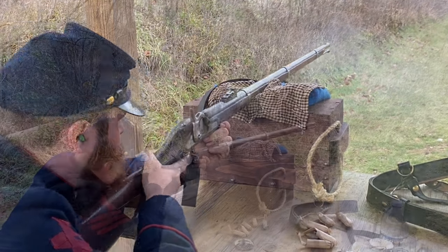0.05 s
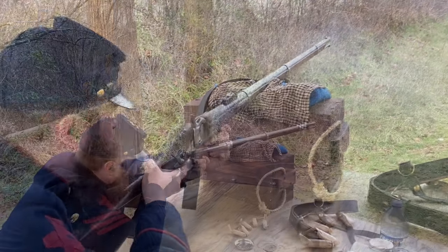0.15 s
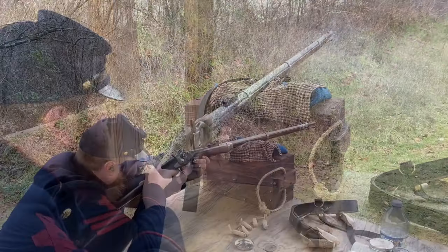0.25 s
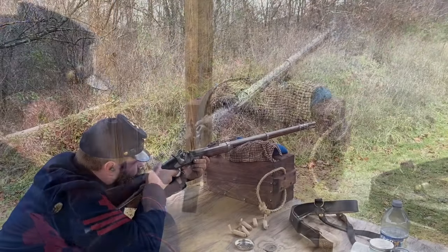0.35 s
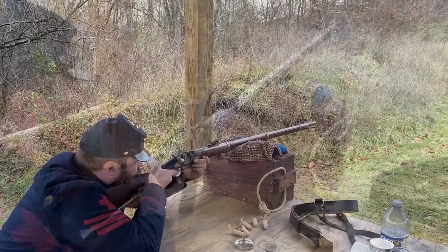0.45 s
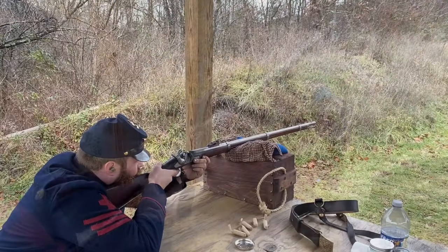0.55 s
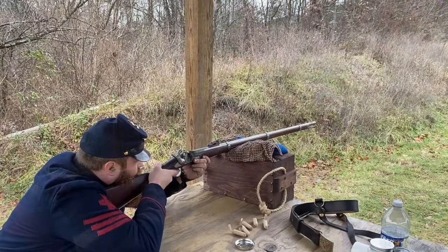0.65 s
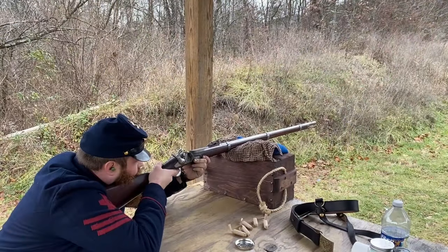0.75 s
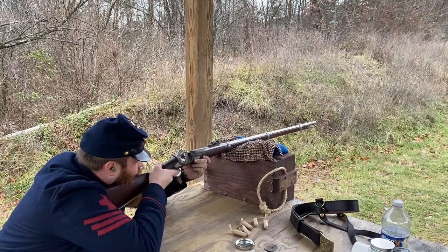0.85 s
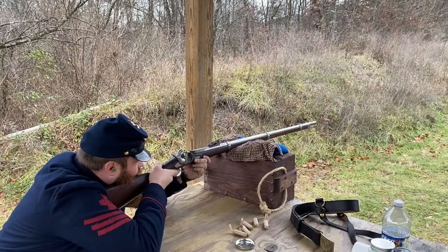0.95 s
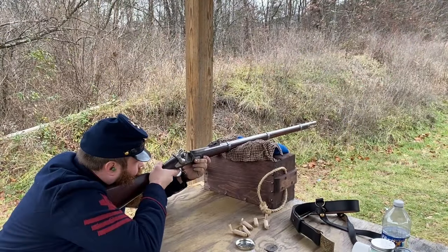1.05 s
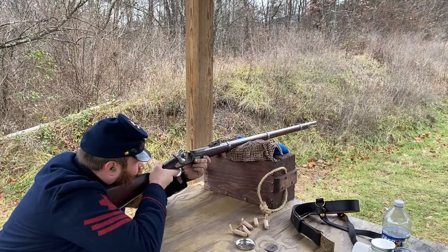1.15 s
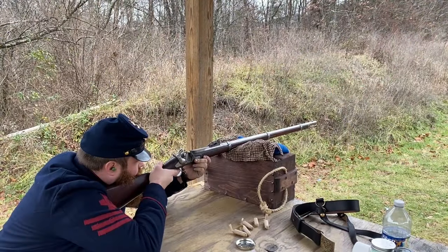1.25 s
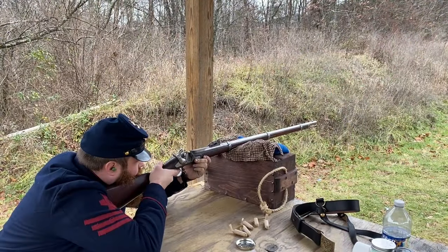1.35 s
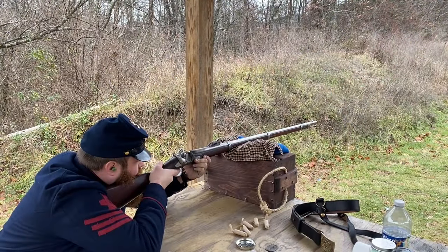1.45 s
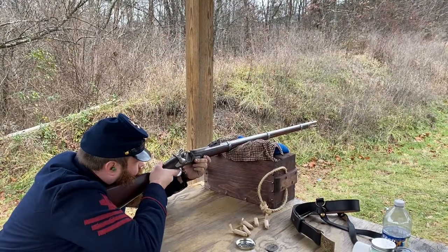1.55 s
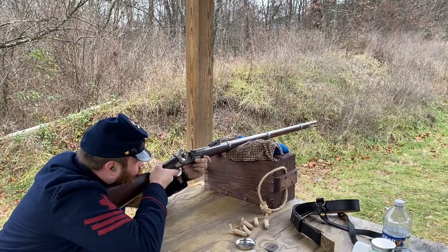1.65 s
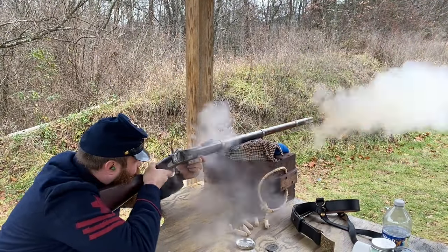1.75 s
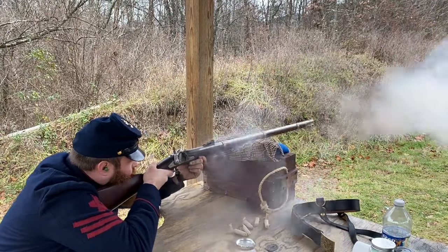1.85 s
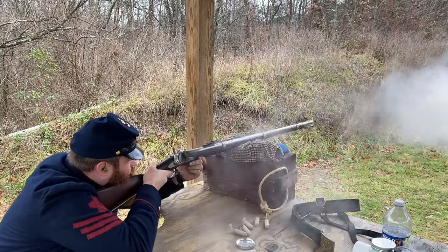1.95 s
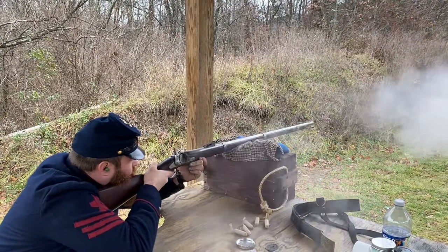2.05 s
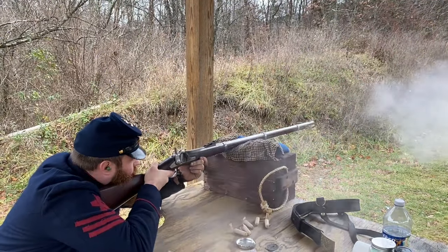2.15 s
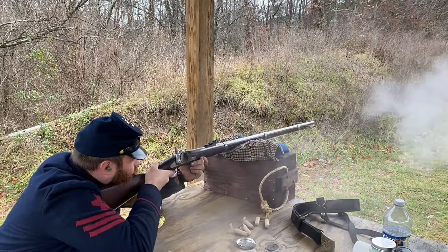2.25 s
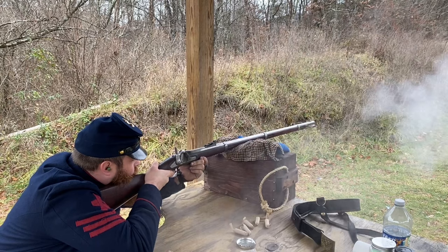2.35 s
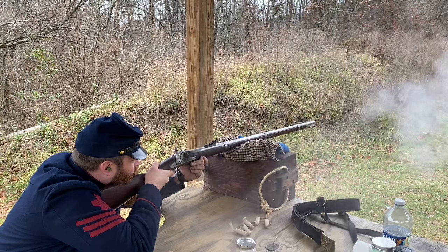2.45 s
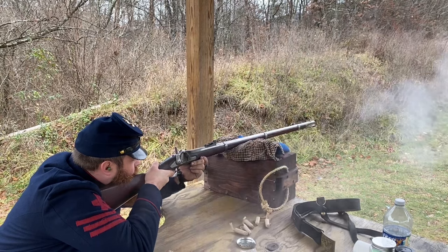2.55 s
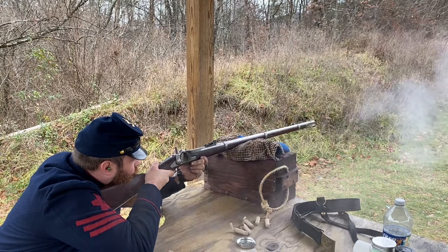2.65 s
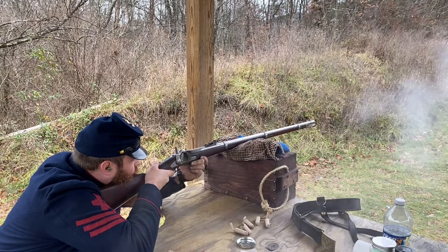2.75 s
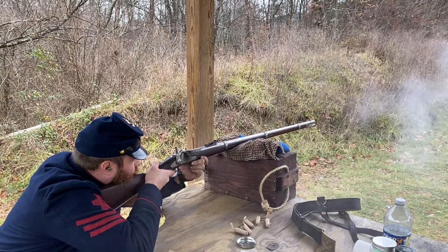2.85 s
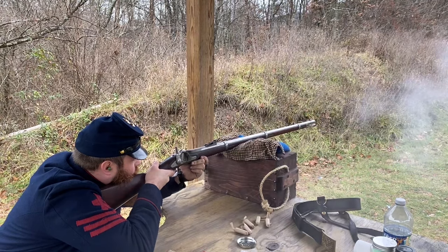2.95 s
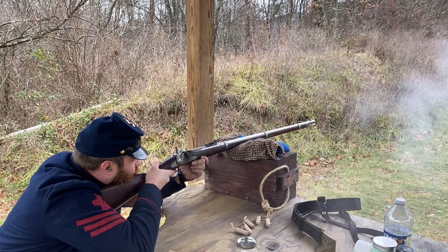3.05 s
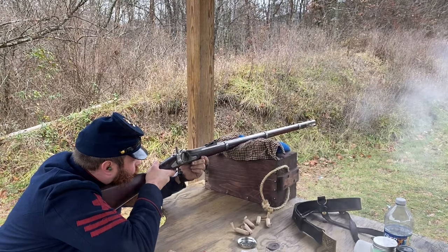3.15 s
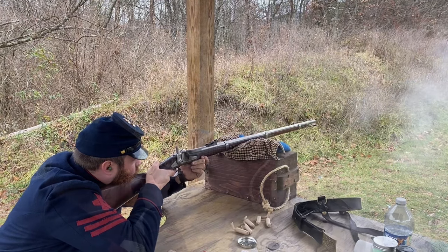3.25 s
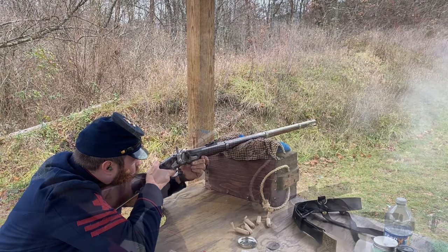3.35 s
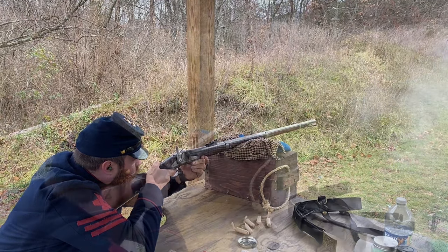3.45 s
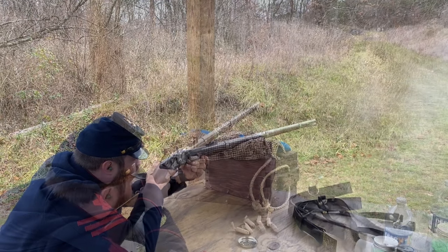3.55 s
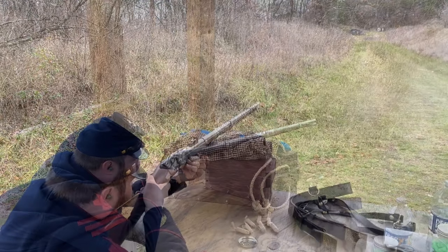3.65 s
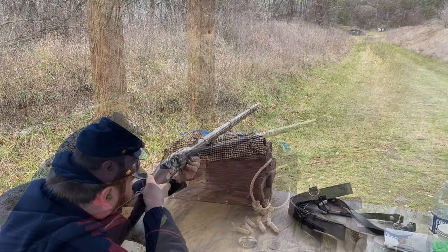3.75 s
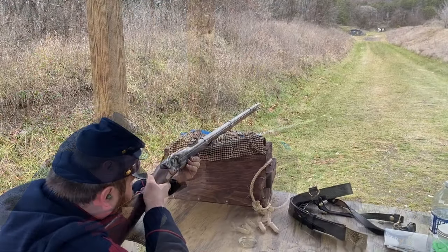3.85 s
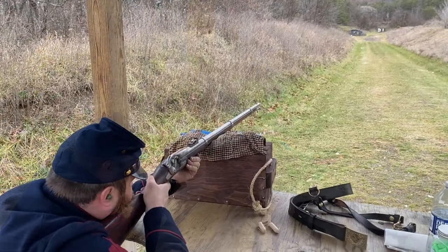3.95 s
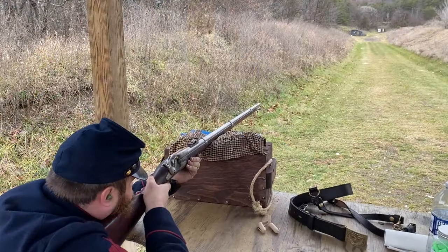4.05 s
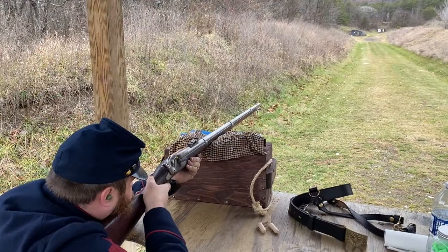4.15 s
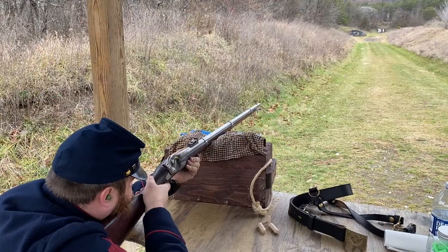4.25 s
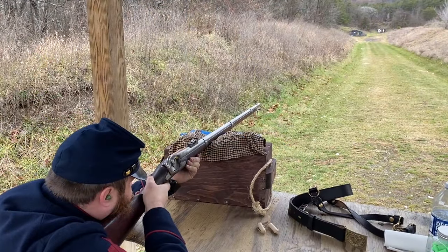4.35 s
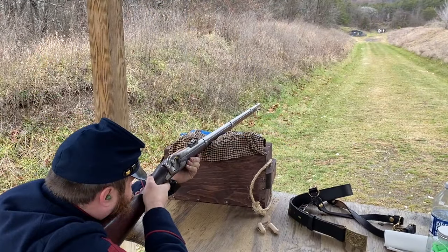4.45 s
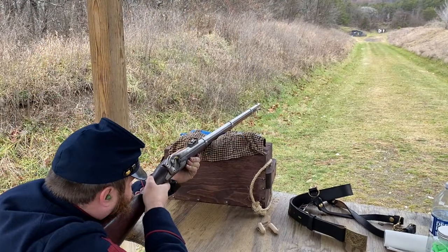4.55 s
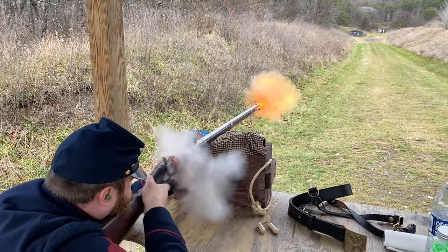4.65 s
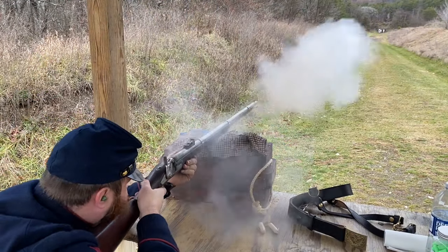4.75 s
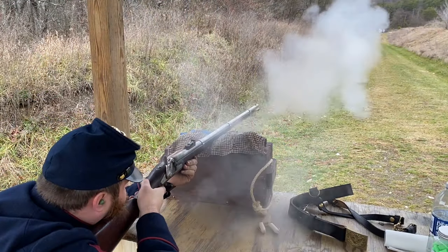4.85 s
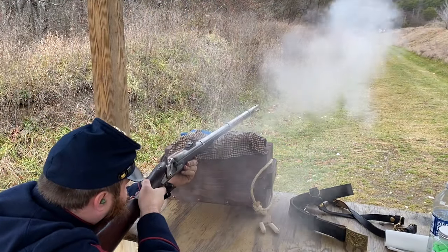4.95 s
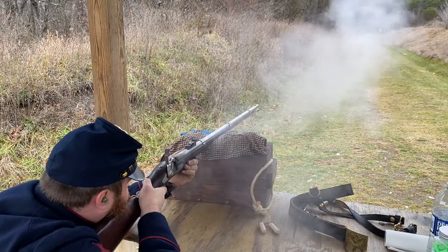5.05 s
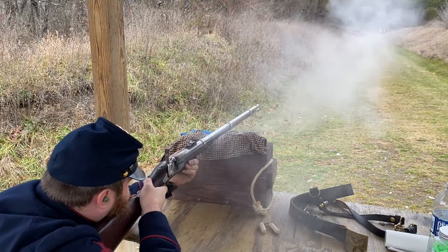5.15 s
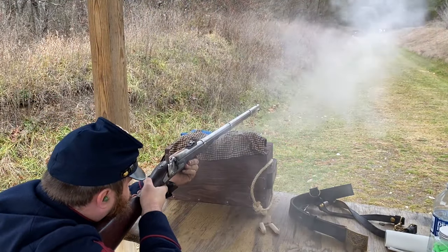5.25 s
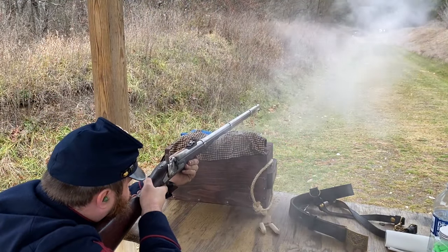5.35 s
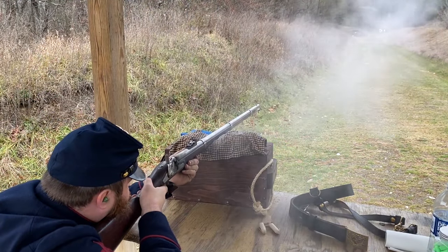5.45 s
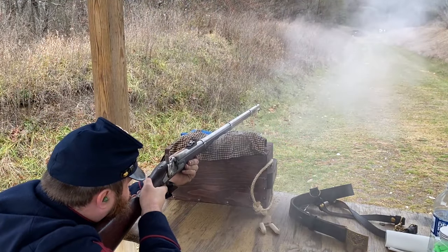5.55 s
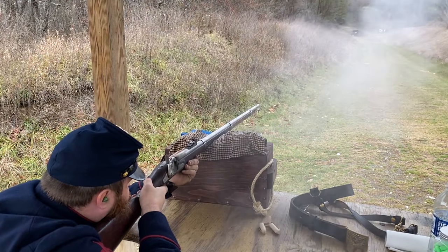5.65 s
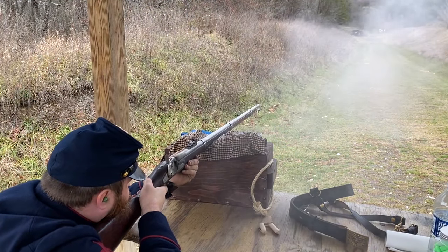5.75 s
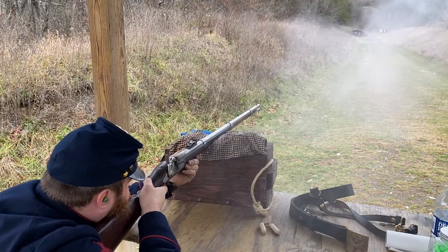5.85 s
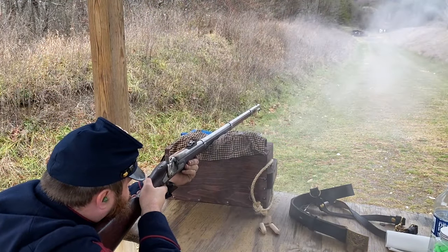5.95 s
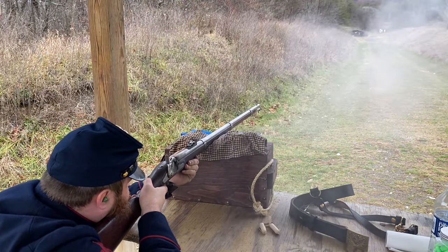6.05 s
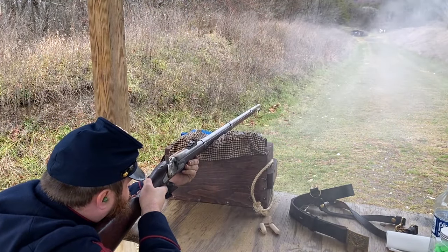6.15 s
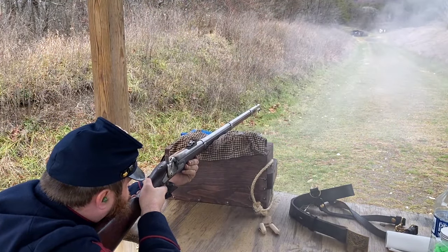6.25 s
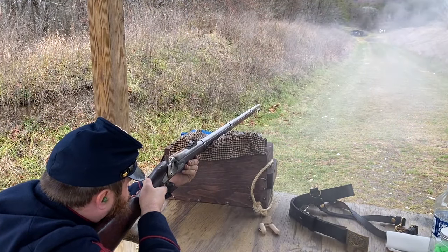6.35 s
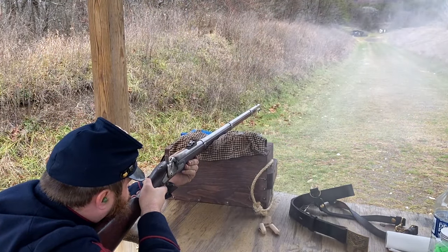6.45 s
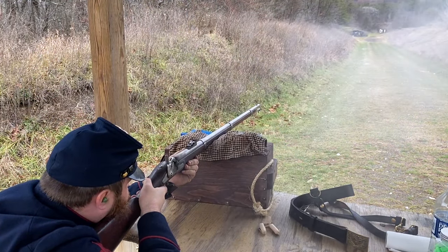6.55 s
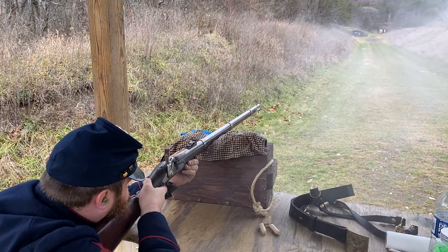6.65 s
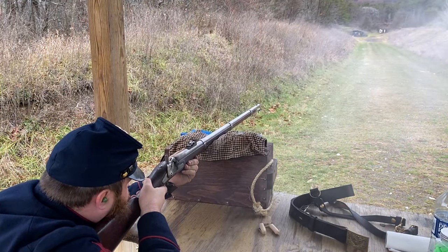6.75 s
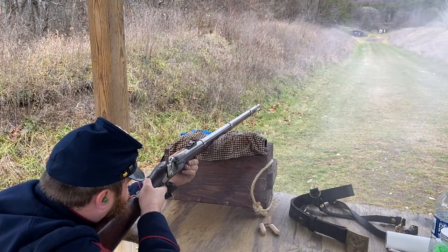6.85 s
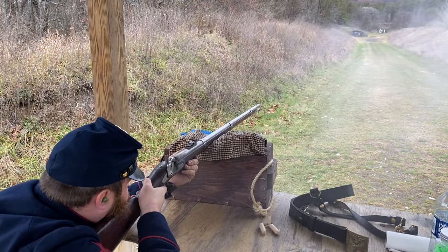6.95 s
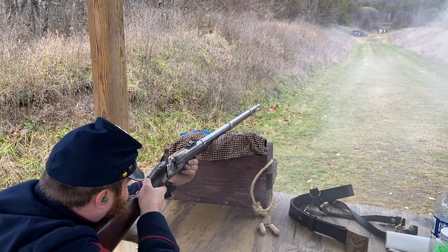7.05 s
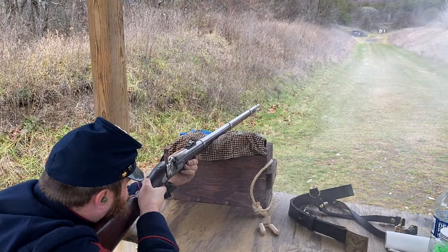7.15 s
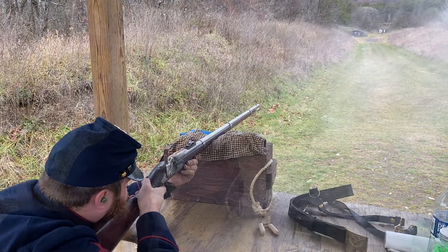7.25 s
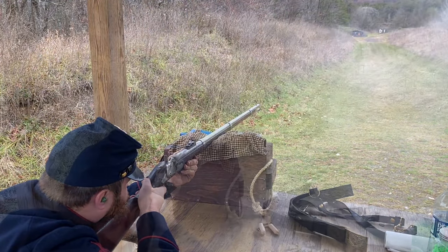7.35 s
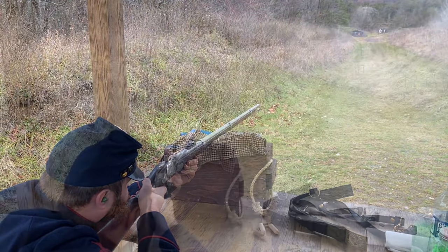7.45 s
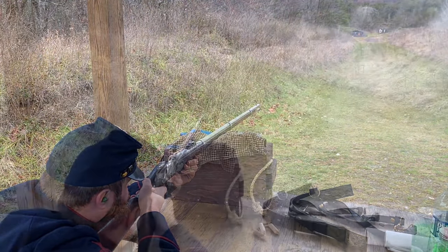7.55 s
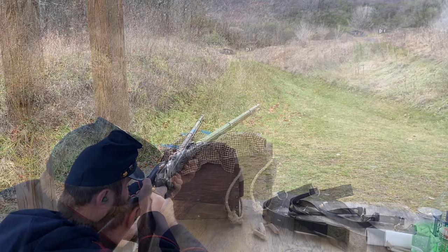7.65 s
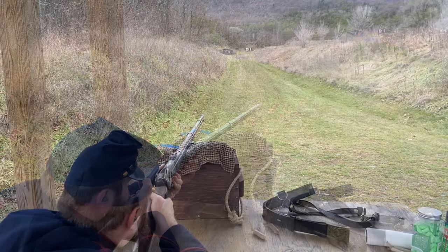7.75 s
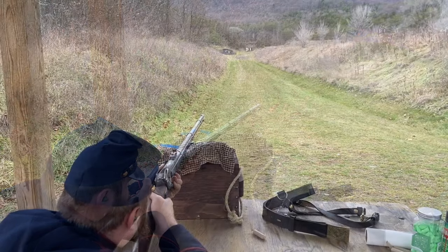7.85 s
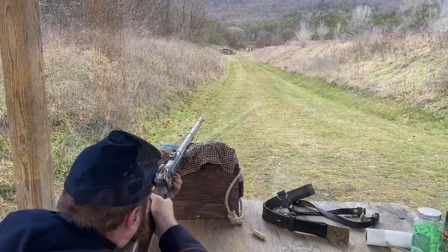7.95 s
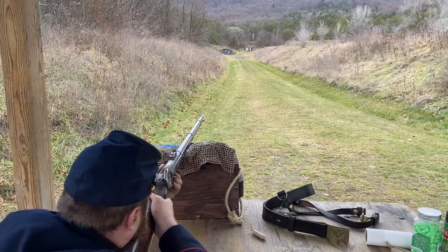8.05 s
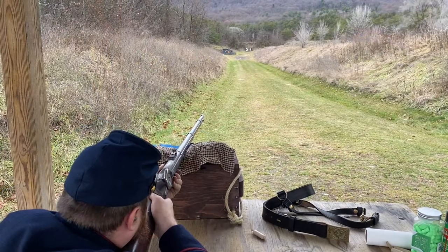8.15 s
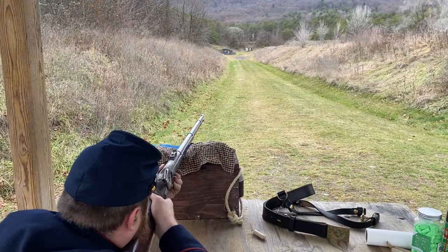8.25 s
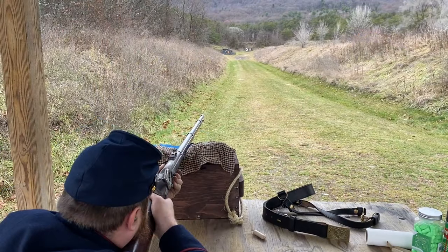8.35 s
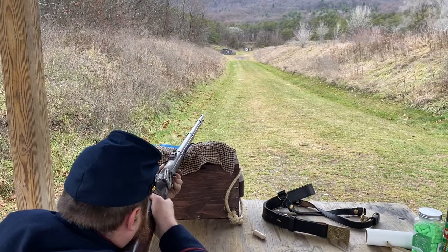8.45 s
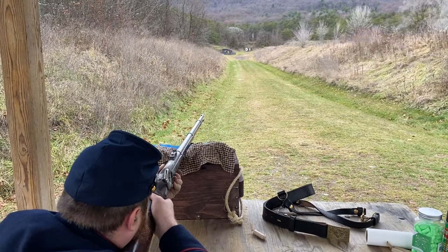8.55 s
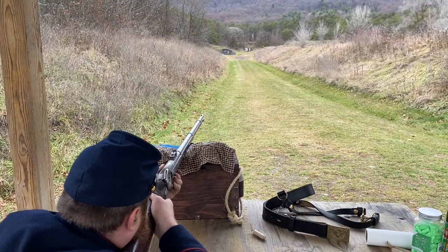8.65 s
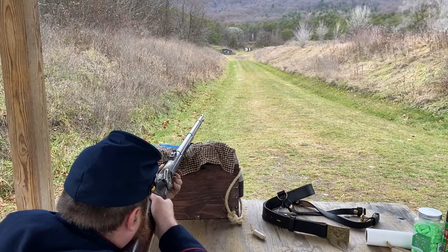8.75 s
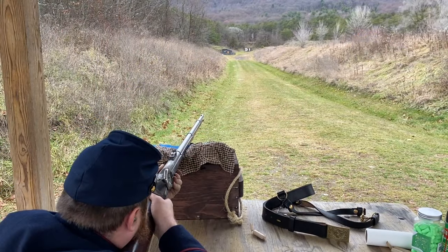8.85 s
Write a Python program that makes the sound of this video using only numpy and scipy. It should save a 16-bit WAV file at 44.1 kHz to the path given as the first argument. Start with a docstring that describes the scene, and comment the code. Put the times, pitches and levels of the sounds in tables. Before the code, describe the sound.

Two loud black-powder rifle shots outdoors, each a cap hiss and overloaded boom with rolling echoes, amid other gunfire, small cracks and low rumble.

```python
"""A black-powder rifle is fired twice from a wooden shelter at the end of a grassy lane between wooded banks.
Cap hiss and blast are shaped noise plus pressure pulses; they overload the microphone, and echoes roll back.
A neighbouring gun fires once; cracks, thumps and knocks are short noise and dying modes, faint tones are sines.
Behind lie a far roar and a low rumble with an engine drone, which drops at each blast and sinks on."""
import sys
import numpy as np
from scipy import signal
from scipy.fft import rfft, irfft, next_fast_len
from scipy.io import wavfile
from scipy.ndimage import uniform_filter1d

SR = 44100
rng = np.random.default_rng(int(sys.argv[2]) if len(sys.argv) > 2 else 0)


def store_pcm(level_fs):
    """Save levels as 16-bit WAV."""
    pcm = np.round(np.clip(level_fs, -1, 1) * 32767).astype(np.int16)
    wavfile.write(sys.argv[1], SR, np.atleast_2d(pcm).T)


N = 392049

# the two rifle shots: [cap t/s, rise of the cap hiss/s, cap level/dB, blast t/s, blast level/dB,
# bass left over right/dB]
SHOTS = [(1.813, .008, -6.5, 1.828, -11.5, 4), (4.744, 0.01, -9, 4.768, -10.5, 1.5)]


def shot(cap_s, rise_s, cap_db, blast_s, blast_db, bass_left_db):
    """The cap spits and hisses at the breech; then the muzzle blast bounces between roof, posts and bench."""
    # colour of the cap hiss: [f/Hz, relative level/dB]
    cap_colour = [(35, -29.5), (60, -6), (527, -3.5), (4220, -15), (4640, -22.5), (6430, -15.5),
                  (7400, -22.5), (8120, -16), (8710, -47), (16000, -43)]
    # colour of the muzzle blast: [f/Hz, relative level/dB]
    blast_colour = [(30, -7.5), (70, -1.5), (140, -2.5), (260, -1), (520, -4), (900, -4.5), (1500, -7),
                    (4000, -17.5), (7000, -23), (11000, -23), (16000, -30.5)]
    # decay under the roof: [f/Hz, time to fall 60 dB/s]
    shelter_decay = [(40, 0.23), (120, 0.32), (300, .22), (1000, 0.15), (4000, 0.17), (8000, .16),
                     (14000, .15)]
    # ring of lock, barrel and bench: [f/Hz, width/Hz, height/dB]
    lock_modes = [(258, 72, 3), (545, 68, 6.5), (1137, 40, 5.5), (1910, 100, 5), (4460, 180, 6.5),
                  (5360, 440, 7), (6030, 120, 8), (6550, 57, 8.5), (7700, 170, 7)]

    def cap_shape(hz, t):
        return read(cap_colour, hz) + bumps(lock_modes, hz)

    def blast_shape(hz, t):
        decay_db = 60 * np.maximum(t - .02, 0) / read(shelter_decay, hz)
        return read(blast_colour, hz) + .5 * bumps(lock_modes, hz) - decay_db

    t = np.arange(round(.35 * SR)) / SR
    after_blast = np.maximum(t - (blast_s - cap_s), 0)
    hiss = np.minimum(t / rise_s, 1) ** 1.6 * np.exp(-after_blast / .005)
    cap = field(.35, cap_shape, alike=0.43, bass_left_db=bass_left_db, size=512)
    boom = field(.35, blast_shape, alike=0.99, bass_left_db=bass_left_db,
                 patchy_db=2, flicker_db=2, size=512)
    # shock front: a push and a rebound
    quick = t / 0.00071
    front = 2.5 * (1 - quick) * np.exp(-quick)
    # powder gas shoves the air aside, stronger on the left
    slow = t / 0.0082
    heave = .6 * slow * (1 - slow / 3) * np.exp(-slow) * gain_of([[6], [-6]])
    blast = boom * np.minimum(t / 0.0015, 1) + front + heave
    out = np.zeros((2, N))
    add(out, cap_s, gain_of(cap_db) * cap * hiss)
    add(out, blast_s, gain_of(blast_db) * blast)
    return out


def echoes(blast_s):
    """Nearby trees answer brightly; the bank slaps back; later echoes lose treble to the air."""
    # near trees, then the far bank, then the valley: [t after the blast/s, level/dB]
    roll_level = [(.035, -41.5), (.13, -43.5), (.222, -44), (.235, -38), (.272, -35.5), (.36, -38.5),
                  (.5, -43.5), (.85, -56.5), (1.1, -62), (1.4, -66), (2.1, -82)]
    # colour of the rolling echo: [f/Hz, relative level/dB]
    roll_colour = [(30, -18.5), (100, 9.5), (300, -1), (800, 1), (1500, -4), (3000, -11.5), (6000, -22),
                   (10000, -31.5), (16000, -34)]
    bank_s, bank_db = .2318, -28  # delay and level of the slap from the far bank

    def roll_shape(hz, t):
        air_loss_db = 24 * np.clip(t - .3, 0, .55) * (hz / 5000) ** 2.0
        near_trees_db = 6 * (t < .19) * np.clip(hz / 4000, 0, 1)
        return read(roll_colour, hz) - air_loss_db + near_trees_db

    out = np.zeros((2, N))
    add(out, *played(np.add(roll_level, [blast_s, 0]), roll_shape,
                     alike=0.94, patchy_db=2, flicker_db=1, size=1024))
    add(out, blast_s + bank_s, slap(bank_db))
    add(out, blast_s + bank_s + .02, ring(-36, 150, .3, .015))  # low thud behind the slap
    return out


def slap(db):
    """One strong dull echo: a broad low-pitched burst without ringing body."""
    return burst(db, 700, 1.5, 1, .2, -8, 0, body=[])


def neighbour_gun():
    """The other gun and its echoes: one noise field that follows their levels and loses treble."""
    # the gun and its echoes: [t/s, level/dB]
    gun_level = [(1.177, -24.5), (1.215, -31.5), (1.245, -28), (1.27, -32.5), (1.45, -33), (1.63, -33),
                 (1.822, -37)]
    # colour at the start: [f/Hz, relative level/dB]
    gun_colour = [(60, -22), (110, -7), (200, -14.5), (300, -5.5), (530, -5.5), (920, 0), (1900, -10.5),
                  (3500, -19.5), (5500, -31), (9000, -56), (12000, -72.5), (16000, -100)]

    def gun_shape(hz, t):
        return read(gun_colour, hz) - 22 * t * (hz / 5000) ** 0.94

    return played(gun_level, gun_shape, alike=0.94, lead_s=.00043, patchy_db=2, size=512)


def burst(db, hz, octaves, pitch, t60, tail_db, pan_db, body=None):
    """A crack: a snap with a few quick rebounds that ring the struck body, then a tail that loses its treble first."""
    if body is None:
        # modes of the struck body, before the pitch ratio: [f/Hz, width/Hz, height/dB]
        body = [(1580, 170, 6.5), (2030, 130, 10.5), (2685, 51, 4.5), (3360, 170, -0.5), (4080, 160, 5),
                (5560, 310, 1.5)]
    snap_db, snap_turns = 4, 26  # first contact: level before the crack's own, cycles to die by 60 dB

    def colour(f):
        return -6 * (np.log2((f + 50) / hz) / octaves) ** 2 + bumps(body, f / pitch)

    def crack_shape(f, t):
        return colour(f) - 60 * t / t60 * ((f + 500) / 3000) ** 0.057

    t = np.arange(round(.4 * SR)) / SR
    noise = field(.4, crack_shape, alike=0.84, lead_s=0.000426, patchy_db=3.0)
    rebounds = 0
    for late, size in rng.random((3, 2)) * [.03, .4]:  # up to 30 ms late
        rebounds = rebounds + size * np.exp(-(t - late) / 0.00077) * (t > late)
    out = noise * np.minimum(t / .0008, 1) * (np.exp(-t / .002) + rebounds + gain_of(tail_db))
    add(out, 0, ring(snap_db, hz, snap_turns / hz, .0003))
    for f, width, _ in body:
        add(out, 0, ring(colour(f * pitch) - 12, f * pitch, 4.4 / width, 0.00084))
    return gain_of(db - 9.0) * out * gain_of([[pan_db / 2], [-pan_db / 2]])


def ring(db, hz, t60, rise_s):
    """One dying mode with a soft start."""
    t = np.arange(round(.25 * SR)) / SR
    envelope = gain_of(db - 60 * t / t60) * (1 - np.exp(-t / rise_s))
    return (envelope * np.sin(2 * np.pi * hz * t))[None]


def knocks():
    """Faint dull knocks at set times, and many fainter ones scattered among them."""
    # the clear knocks: [t/s, level/dB, f/Hz]
    clear_knocks = [(5.96, -61, 1002), (6.028, -60.5, 915), (6.199, -59, 896), (6.288, -60.5, 1155),
                    (6.428, -57.5, 1024), (6.549, -60, 940), (7.059, -65, 947)]
    out = np.zeros((2, N))
    for s, db, hz in clear_knocks:
        add(out, s, knock(db, hz))
    for when, loud, pitch in rng.random((50, 3)):
        add(out, 5.9 + 1.2 * when, knock(-72 + 6 * loud, 700 + 450 * pitch))
    return out


def knock(db, hz):
    """A dull knock: a cluster of six short modes round one pitch."""
    return sum(ring(db - 1 - 4 * loud, hz * (.55 + .75 * pitch), .04, .0007)
               for pitch, loud in rng.random((6, 2)))


def twitter():
    """Short, slightly hoarse tones over a soft rustle."""
    # faint tones at set times: [t/s, length/s, f/Hz, glide as a ratio, level/dB]
    set_tones = [(.23, .12, 5740, 1.045, -89), (.36, .12, 6000, 1.01, -92), (.56, .06, 6250, .97, -85),
                 (.66, .13, 5950, .97, -87), (.62, .068, 2550, .995, -77), (.63, .11, 2950, .995, -79),
                 (.68, .14, 1780, .995, -75.5), (.75, .15, 3320, .995, -79), (.845, .16, 3805, .994, -70.5),
                 (.85, .066, 876, .995, -59.5), (.9, .07, 1556, .995, -69.5), (.95, .045, 693, .995, -63),
                 (.98, .094, 867, .995, -62)]
    # soft rustle: [t/s, level/dB]
    rustle_level = [(.1, -89), (.4, -82), (.7, -72.5), (1., -70.5), (1.15, -76)]
    out = np.zeros((2, N))
    for s, seconds, hz, glide, db in set_tones:
        add(out, *whistle([(s, hz, db), (s + seconds, hz * glide, db)]))
    for when, pitch in rng.random((14, 2)):  # more scattered faint tones, later ones louder
        s, hz = .28 + .72 * when, 1800 * 2.3 ** pitch
        db = -95 + 14 * s
        add(out, *whistle([(s, hz, db), (s + .09, hz, db)]))
    add(out, *played(rustle_level, lambda hz, t: -7 * np.log2((hz + 50) / 2200) ** 2,
                     patchy_db=3.5, size=1024))
    return out


def whistle(rows):
    """A thin tone, unsteady in pitch and level, along rows of (t/s, f/Hz, level/dB)."""
    s, hz, db = np.transpose(rows)
    t = np.arange(s[0], s[-1], 1 / SR)
    shake, waver = uniform_filter1d(rng.standard_normal((2, len(t))), size=500)
    pitch_hz = np.interp(t, s, hz) + 10 * evened(shake)
    tone = np.sqrt(2) * np.sin(2 * np.pi * np.cumsum(pitch_hz) / SR)
    level = gain_of(np.interp(t, s, db) + 2.5 * evened(waver))
    return s[0], (level * tone * signal.windows.tukey(len(t), .4))[None]


def roar():
    """A far roar, maybe gunfire rolling in from down the valley: its treble comes first; it rises, holds and falls."""
    # colour once the early treble is gone: [f/Hz, relative level/dB]
    roar_colour = [(90, -40), (150, -11.5), (280, -9), (450, -2), (660, 0), (950, -5), (1300, -15.5),
                   (2000, -24.5), (3300, -40), (5500, -48), (9000, -59), (14000, -90)]
    start, start_db, rise_s = 7.27, -72, .13  # start/s, level/dB, time constant of the rise/s
    hold_db, until, fall_db_per_s = -48.5, 8.16, -10.5  # held level, end of the hold/s, slope after it

    def roar_shape(hz, t):
        early_treble_db = 13 * np.exp(-t / .3) * np.clip(np.log2((hz + 1) / 900), 0, 1)
        return read(roar_colour, hz) + early_treble_db

    s = np.arange(start, N / SR, .01)
    rise_db = (start_db - hold_db) * np.exp(-(s - start) / rise_s)
    db = hold_db + rise_db + fall_db_per_s * np.maximum(s - until, 0)
    return played(np.c_[s, db], roar_shape, alike=0.86, lead_s=0.00041, size=1024)


def rumble():
    """Low outdoor rumble with a far engine drone, and a far murmur that shows in the lulls."""
    # three swells, the first two cut by a shot: [start t/s, top t/s, top level/dB, level at the end/dB]
    swells = [(-.05, 1.114, -43, -48), (3.319, 4.406, -43.5, -45.5), (7.22, 8.405, -55, -54)]
    # colour of the rumble: [f/Hz, relative level/dB]
    rumble_colour = [(15, -30.5), (30, -10.5), (50, -2.5), (90, -4.5), (200, -18), (320, -14), (450, -20),
                     (1000, -20.5), (1900, -35), (2800, -49.5), (4500, -62), (8000, -67.5), (12000, -100)]
    # far engine drone within the noise: [f/Hz, width/Hz, height/dB]
    hum_modes = [(62, 12, 5), (90, 12, 4), (142, 12, 12), (255, 9, 11), (288, 9, 12)]
    # far murmur: [t/s, level/dB]
    murmur_level = [(0, -96), (.7, -72), (3.3, -73.5), (5.9, -70), (6.8, -70.5), (7.22, -77.5), (7.5, -67),
                    (8.89, -72)]
    quiet_db, bend = -69.5, 0.5  # level between the swells; rise is quick at first
    lull_db, sink_db_per_s = -62.5, -3  # level right after a shot, sinking on from there

    s = np.arange(0, N / SR, .01)
    level_db = np.full(len(s), quiet_db)
    ends = [row[3] for row in SHOTS] + [N / SR]
    for (start, top, top_db, end_db), end in zip(swells, ends):
        progress = np.clip((s - start) / (top - start), 0, 1)
        rise = quiet_db + (top_db - quiet_db) * progress ** bend
        swell = np.where(s < top, rise, np.interp(s, [top, end], [top_db, end_db]))
        lull = lull_db + sink_db_per_s * (s - end)
        level_db = np.maximum(level_db, np.where(s < end, swell, lull))
    lift_db = -0.1384 * (level_db + 61)  # the bass swells more than the rest

    def rumble_shape(hz, t):
        lifted = np.interp(t, s, lift_db) * np.clip(np.log2((hz + 1) / 150) / 2.0, 0, 1)
        return read(rumble_colour, hz) + bumps(hum_modes, hz) + lifted

    out = drone(s, level_db) * np.ones((2, 1))
    add(out, *played(murmur_level, lambda hz, t: -7.5 * np.log2((hz + 50) / 800) ** 2,
                     patchy_db=1.5, flicker_db=1.5, size=1024))
    add(out, *played(np.c_[s, level_db], rumble_shape, alike=1.2, size=4096))
    return out


def drone(s, level_db):
    """Slightly wavering engine lines that follow the rumble."""
    # clear lines of the drone: [f/Hz, level over the rumble/dB]
    engine_lines = [(62.5, -10.5), (249, -22), (286.5, -19)]
    t = np.arange(N) / SR

    def slow_waver():
        return evened(np.interp(t, s, uniform_filter1d(rng.standard_normal(len(s)), size=25)))

    lines = 0
    for hz, db in engine_lines:
        level = gain_of(db + 4.1 * slow_waver())
        pitch_hz = hz * (1 + 0.009 * slow_waver())
        lines = lines + level * np.sin(2 * np.pi * np.cumsum(pitch_hz) / SR)
    return (np.sqrt(2) * lines * gain_of(np.interp(t, s, level_db)))[None]


def field(seconds, shape, alike=0.37, lead_s=0., bass_left_db=0., patchy_db=1.0, flicker_db=0.5, size=256):
    """Countless small arrivals: random spectra shaped in dB by shape(hz, t); the right ear leads by lead_s."""
    # left-right likeness, before the factor alike: [f/Hz, likeness 0-1]
    likeness = [(40, 0.74), (200, 0.63), (700, 0.4), (1500, 0.1), (2600, .8), (3500, .5), (4500, 0.76),
                (5800, 0.49)]
    count, hop = round(seconds * SR), size // 4
    hz = np.fft.rfftfreq(size, 1 / SR)[:, None]
    t = np.arange(count // hop + 6) * hop / SR
    a, b, c, d, patches = rng.standard_normal((len(t), len(hz), 5)).T
    flicker = patches[0]  # one value a frame, for all frequencies
    patches = uniform_filter1d(patches, size=5, axis=0)
    patches = evened(uniform_filter1d(patches, size=12, axis=1))
    same = np.clip(alike * read(likeness, hz), 0, 1)
    left = a + 1j * b
    right = same * left * np.exp(2j * np.pi * hz * lead_s) + np.sqrt(1 - same ** 2) * (c + 1j * d)
    # bass leans left, treble a little right
    lean = gain_of(bass_left_db / 2 * np.clip(np.log2(500 / (hz + 30)) / 3, -.4, 1))
    level = gain_of(shape(hz, t) + patchy_db * patches + flicker_db * flicker)
    spectra = np.array([left * lean, right / lean]) * level
    # about rms 1 at the start
    scale = np.sqrt(2 / 3 * np.sum(gain_of(shape(hz, t[:1])) ** 2))
    return signal.istft(spectra / scale, nperseg=size, noverlap=size - hop)[1][:, :count]


def played(rows, shape, **how):
    """A field whose level follows a (t/s, level/dB) curve; returns its start and sound."""
    s, db = np.transpose(rows)[:2]
    x = field(s[-1] - s[0], shape, **how)
    t = np.arange(x.shape[1]) / SR
    ends = np.clip(np.minimum(t, t[::-1]) / .002, 0, 1)
    return s[0], x * gain_of(np.interp(s[0] + t, s, db)) * ends


def bumps(modes, hz):
    """Resonances as dB bumps on a spectrum."""
    return sum(db / (1 + (2 * (hz - f) / width) ** 2) for f, width, db in modes)


def read(points, hz):
    """Reads a spectrum on a log-frequency axis."""
    f, value = np.transpose(points)
    return np.interp(np.log(hz + 1), np.log(f + 1), value)


def gain_of(db):
    """dB to gain."""
    return 10 ** (np.asarray(db) / 20)


def evened(x):
    """Scales to rms 1."""
    return x / np.sqrt(np.mean(x ** 2) + 1e-20)


def add(mix, s, sound):
    """Mixes a sound in at a time."""
    part = mix[:, round(s * SR):][:, :sound.shape[-1]]
    part += sound[..., :part.shape[1]]


def scene():
    """Shots and echoes up front, small events around, roar and rumble far behind."""
    # low thumps: [t/s, level/dB, f/Hz, time to fall 60 dB/s]
    thumps = [(0.916, -36, 70, 0.17), (1.035, -36, 54, 0.12), (1.148, -25, 66, 0.35),
              (1.187, -13, 83, 0.083), (7.663, -41, 320, 0.116), (8.151, -43, 173, 0.094)]
    # sharp cracks: [t/s, level/dB, centre f/Hz, octaves from centre to -6 dB, pitch of the body as a ratio,
    # time to fall 60 dB/s, tail/dB, left over right/dB]
    cracks = [(1.104, -35.5, 1190, 1.27, .9, 0.76, -11.5, 3), (1.1775, -24, 1320, 1.08, .9, 0.17, -4, -18),
              (1.232, -28, 1480, 0.96, .9, 0.92, 2, -1), (2.685, -55, 8000, 1.05, 1.1, .12, -8, 4),
              (3.639, -42, 3100, 0.55, .97, .19, -15, 7), (4.039, -64.5, 3970, 0.55, 0.95, .3, -3, -2),
              (4.2978, -35.5, 2170, 1.45, .91, 0.27, -8.5, -0.5),
              (6.399, -64, 2510, 1.05, .9, 0.18, -4.5, 4), (6.616, -66, 2600, .82, .9, 0.14, -4, 6),
              (7.061, -69, 3500, 1.05, .9, 0.17, -4, -2), (7.663, -35.5, 1206, 1.64, 1.02, 0.32, -6.5, 1.5),
              (7.8308, -32, 2460, 0.86, 1.01, 0.31, -11, 1), (8.005, -58.5, 3200, .54, 1.1, 0.17, -2.5, 2),
              (8.1535, -38.5, 1220, 0.99, 0.96, 0.27, 2, -1), (8.165, -45.5, 1700, 1.25, .93, 0.23, 2, 3.5),
              (8.574, -40.5, 1676, 1.33, .93, 0.39, -2, -2), (8.591, -40, 1770, 1.14, .94, 0.23, -1, -4),
              (8.598, -38.5, 1760, 1.02, 0.87, 0.22, -1.3, 3)]
    mix = np.zeros((2, N))
    for row in SHOTS:
        mix += shot(*row) + echoes(row[3])
    add(mix, 5.1075, slap(-24.5))  # one more strong echo
    add(mix, *neighbour_gun())
    for s, db, hz, t60 in thumps:
        add(mix, s, ring(db, hz, t60, 0.0023))
    for s, *row in cracks:
        add(mix, s, burst(*row))
    mix += knocks() + twitter()
    add(mix, *roar())
    return mix + rumble()


def record(dry):
    """Soft overload; above about 6-8 kHz both channels share one treble, the right turned in phase as pitch rises."""
    size = next_fast_len(N + 4096)
    left, right = rfft(.88 * np.tanh(dry / .96), size)
    hz = np.fft.rfftfreq(size, 1 / SR)
    shared = .97 * np.clip((hz - 5800) / 2200, 0, 1)  # how much of the right is the left's treble
    turn = np.exp(2j * np.pi * (hz - 6900) / 4270)
    right = shared * left * turn + np.sqrt(1 - shared ** 2) * right
    wet = irfft(np.array([left, right]), size)[:, :N]
    wet = wet + gain_of(-98) * rng.standard_normal((2, N))  # faint hiss
    edge = signal.firwin(511, 16100, window=("kaiser", 9), fs=SR)  # upper edge of the sound, Hz
    return signal.oaconvolve(wet, edge[None], "same")


dry = scene()
out = record(dry)
store_pcm(out)
```